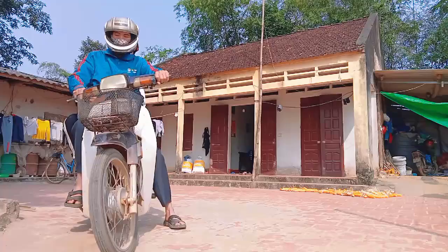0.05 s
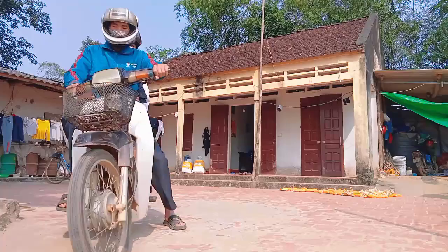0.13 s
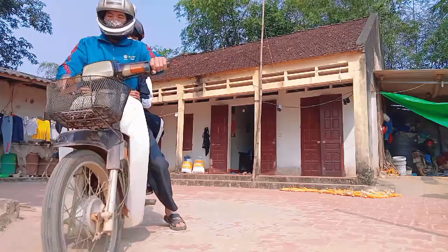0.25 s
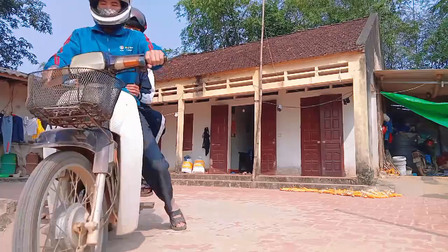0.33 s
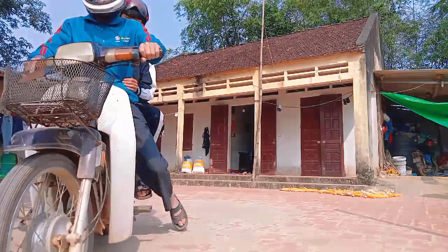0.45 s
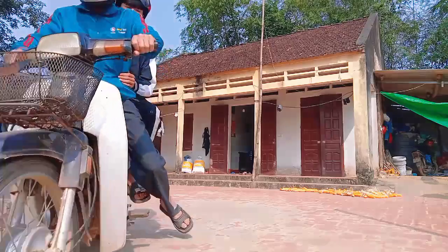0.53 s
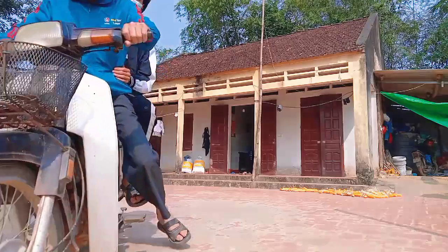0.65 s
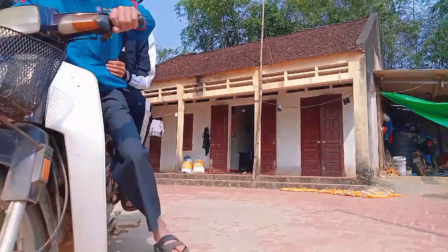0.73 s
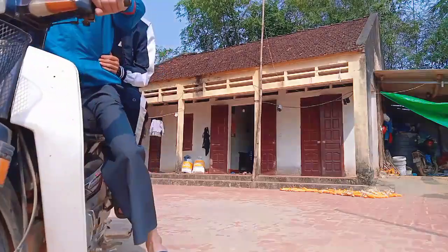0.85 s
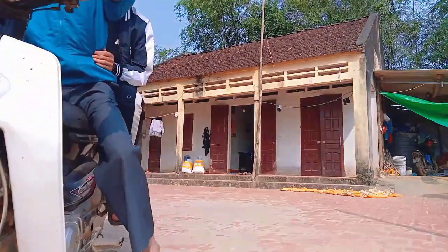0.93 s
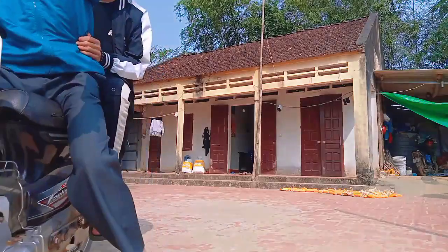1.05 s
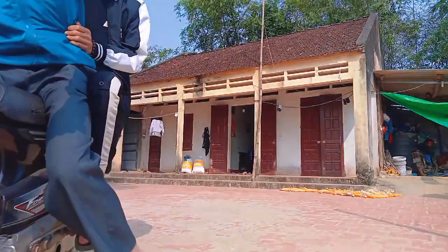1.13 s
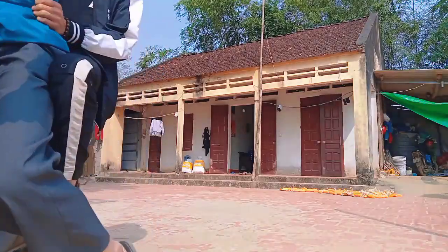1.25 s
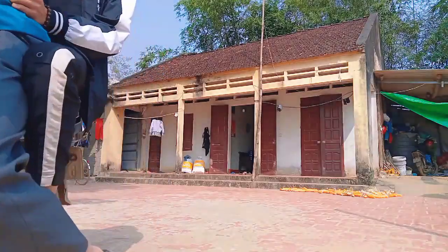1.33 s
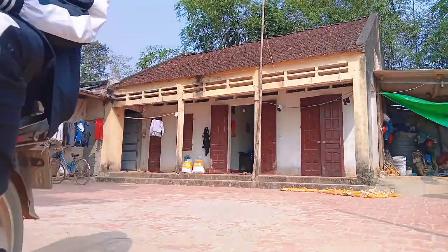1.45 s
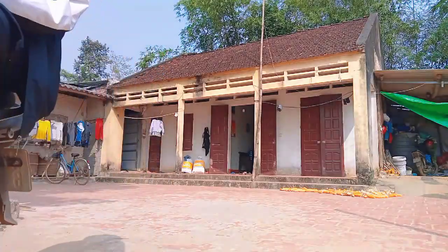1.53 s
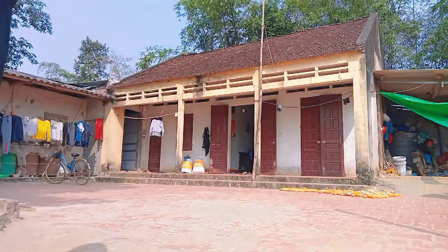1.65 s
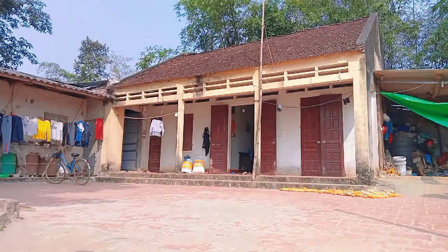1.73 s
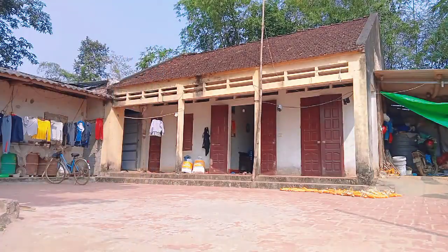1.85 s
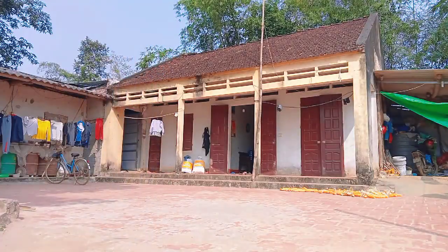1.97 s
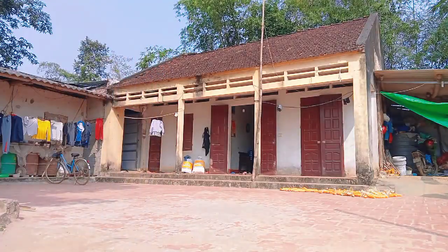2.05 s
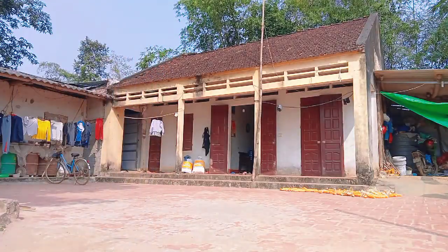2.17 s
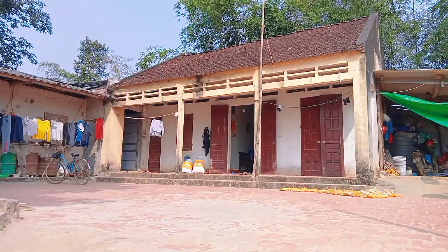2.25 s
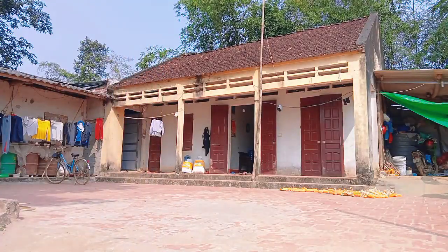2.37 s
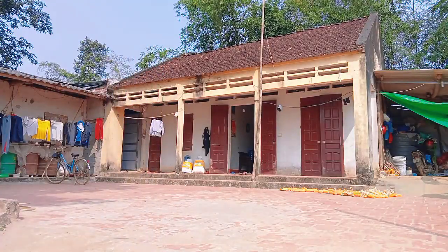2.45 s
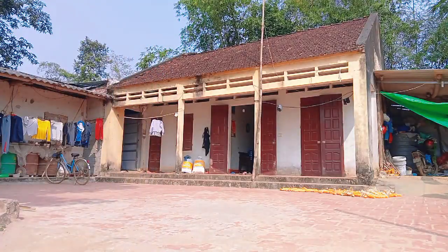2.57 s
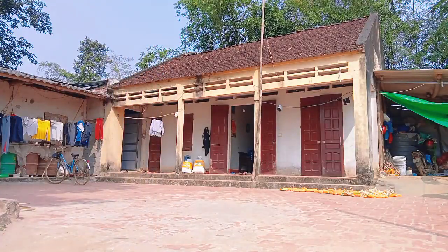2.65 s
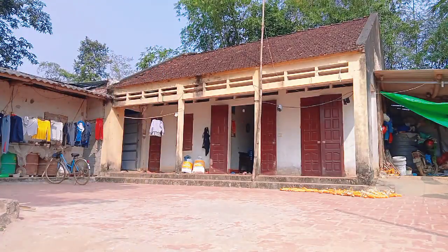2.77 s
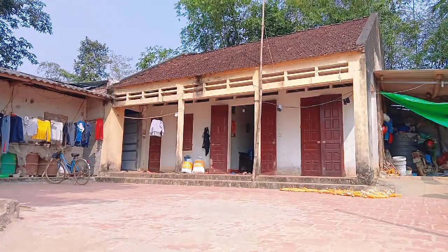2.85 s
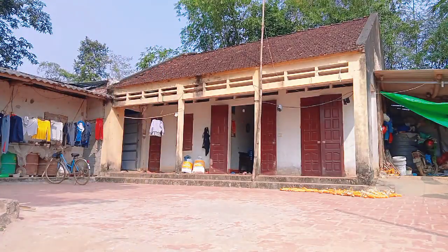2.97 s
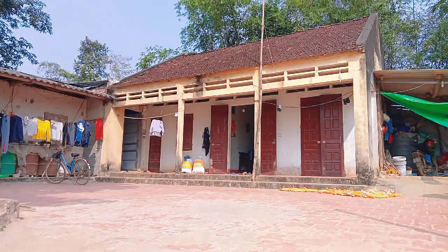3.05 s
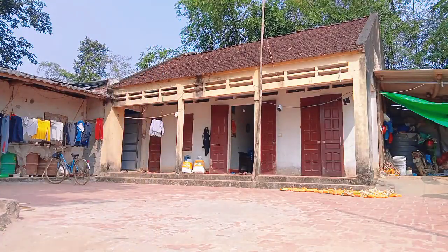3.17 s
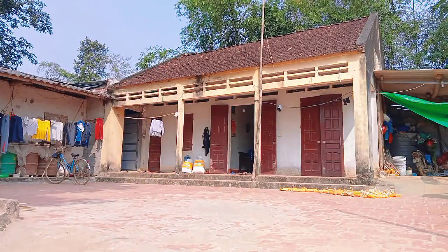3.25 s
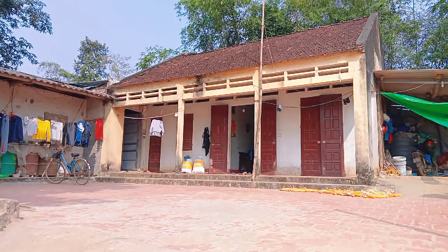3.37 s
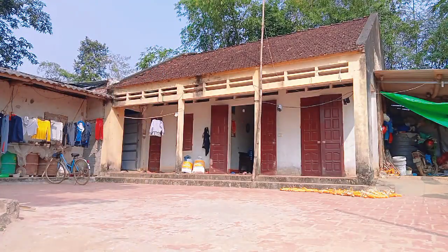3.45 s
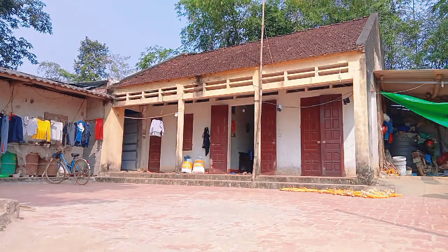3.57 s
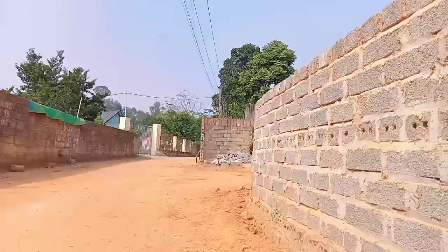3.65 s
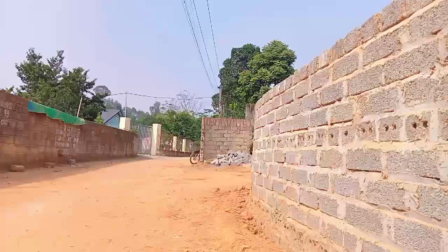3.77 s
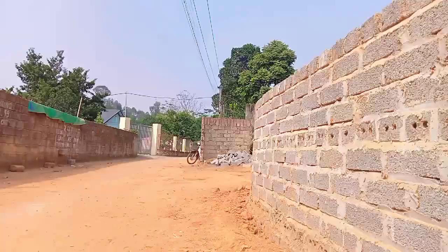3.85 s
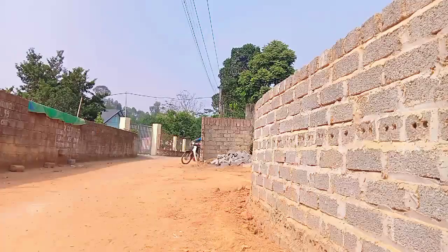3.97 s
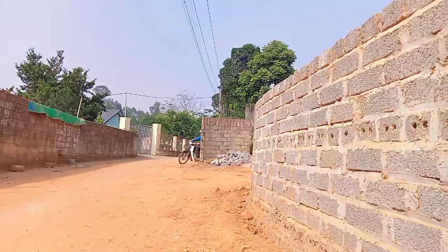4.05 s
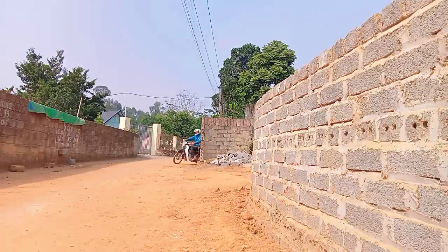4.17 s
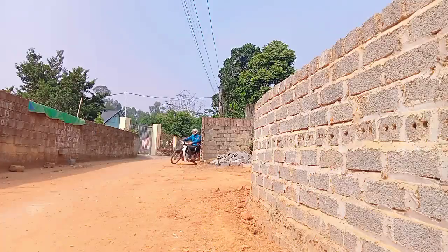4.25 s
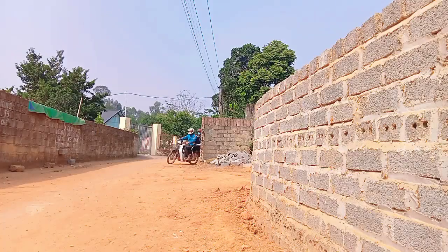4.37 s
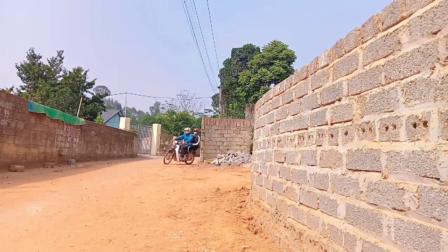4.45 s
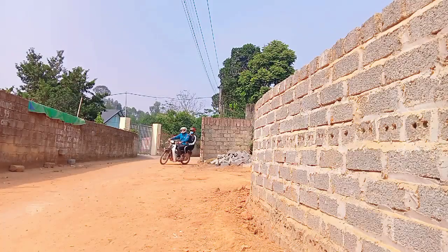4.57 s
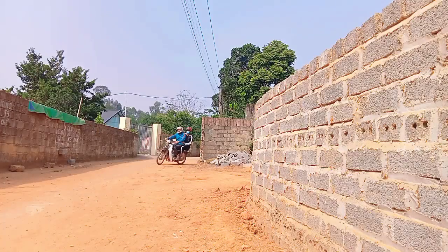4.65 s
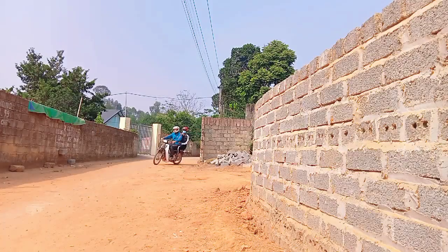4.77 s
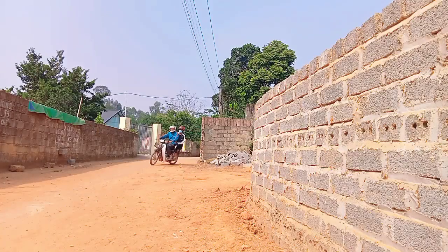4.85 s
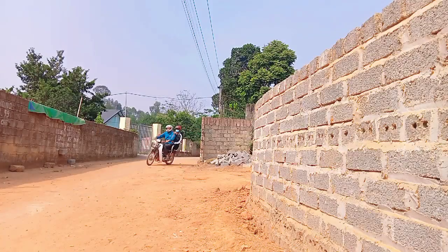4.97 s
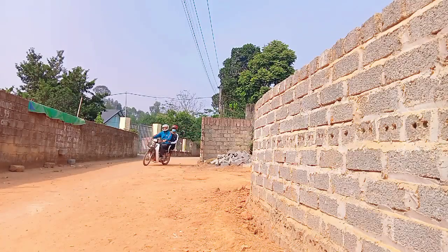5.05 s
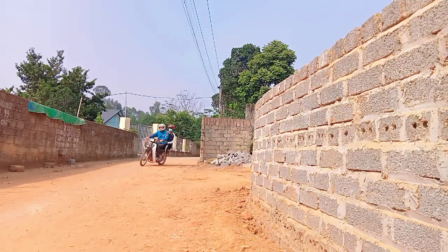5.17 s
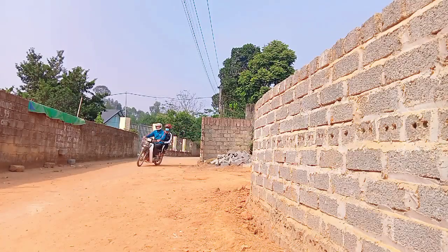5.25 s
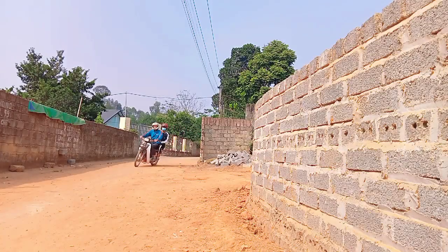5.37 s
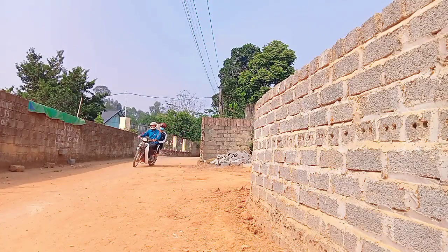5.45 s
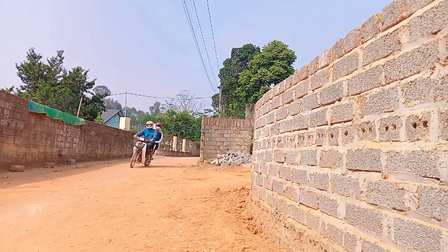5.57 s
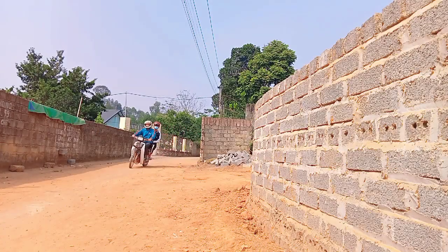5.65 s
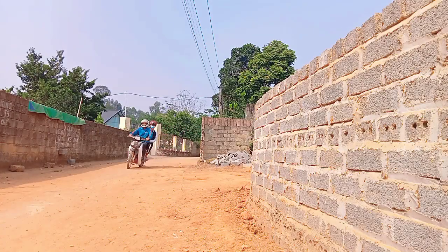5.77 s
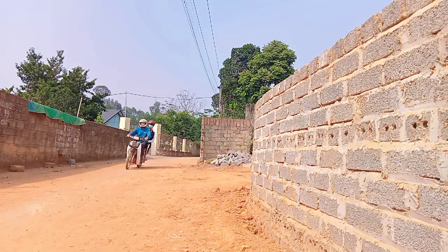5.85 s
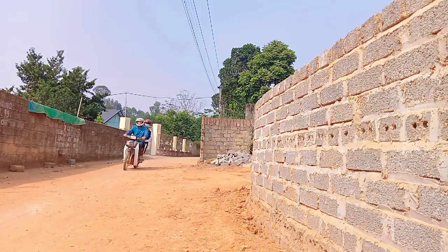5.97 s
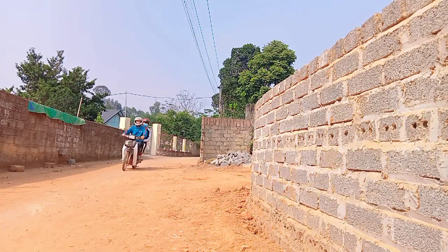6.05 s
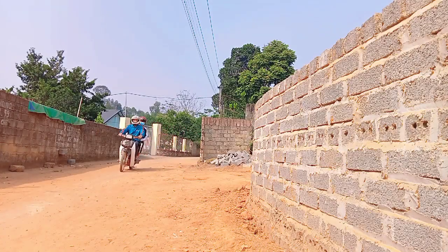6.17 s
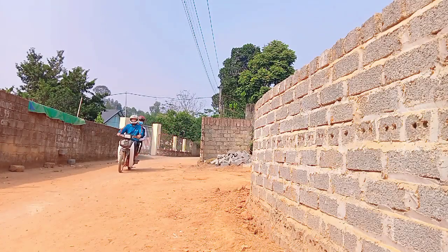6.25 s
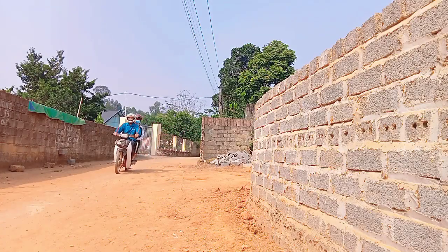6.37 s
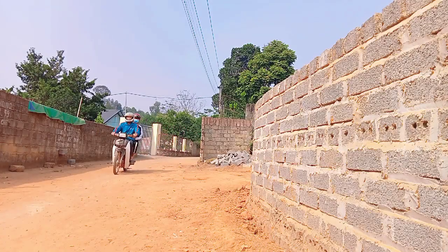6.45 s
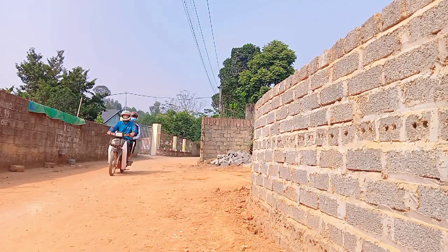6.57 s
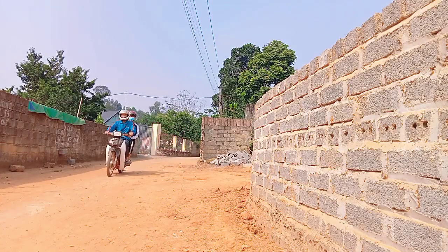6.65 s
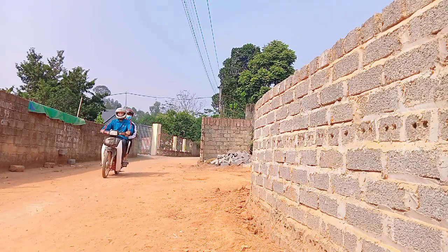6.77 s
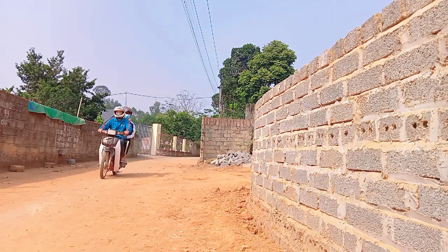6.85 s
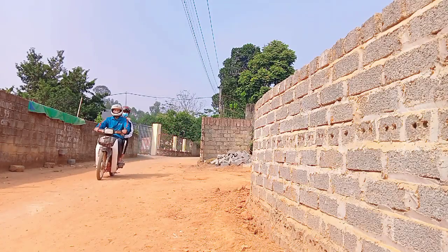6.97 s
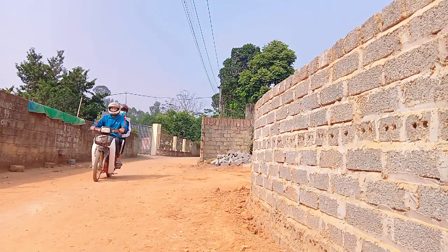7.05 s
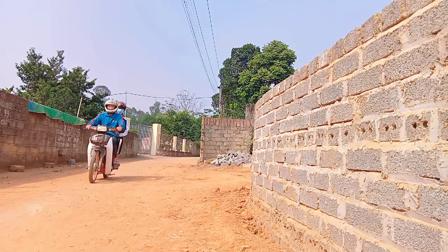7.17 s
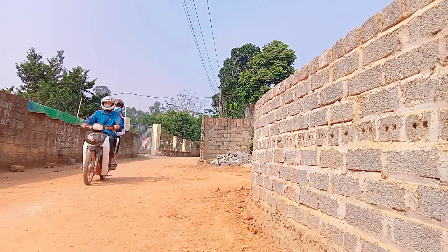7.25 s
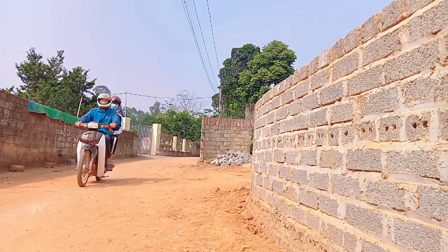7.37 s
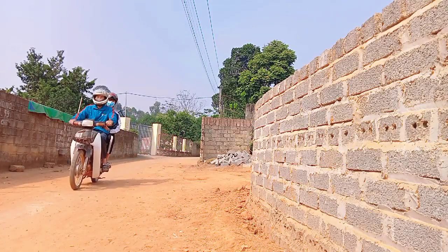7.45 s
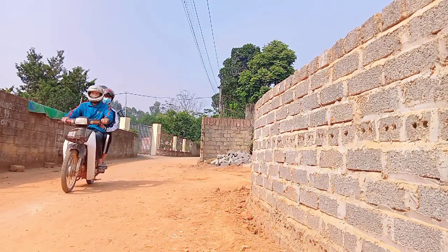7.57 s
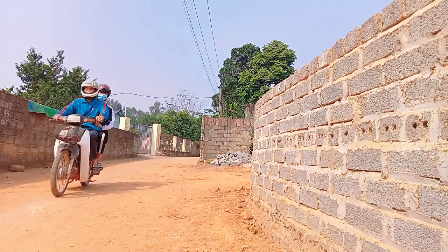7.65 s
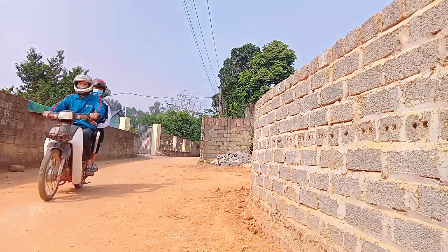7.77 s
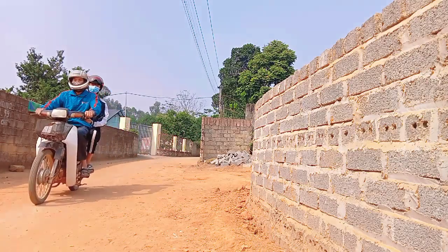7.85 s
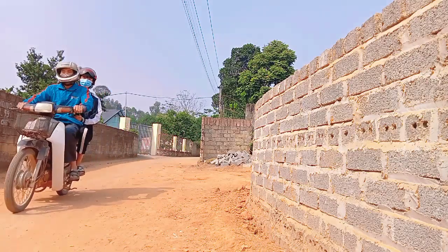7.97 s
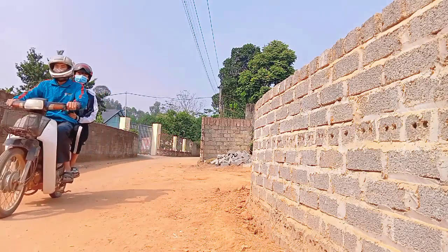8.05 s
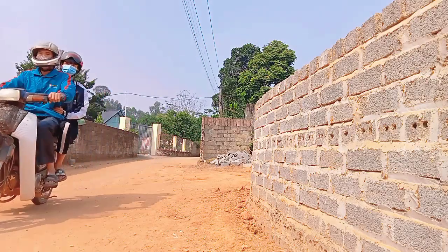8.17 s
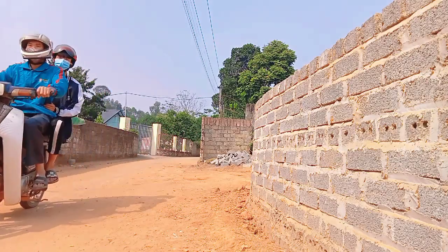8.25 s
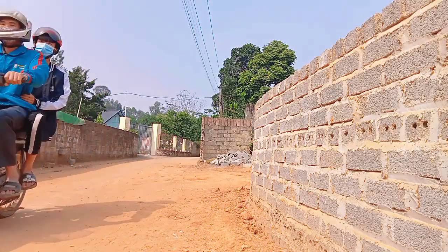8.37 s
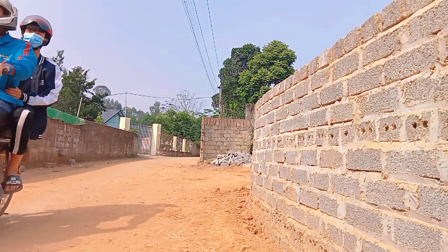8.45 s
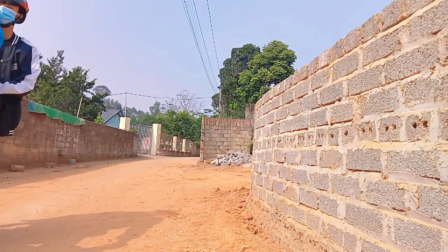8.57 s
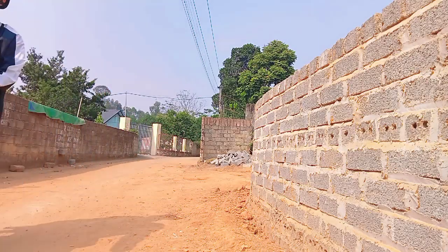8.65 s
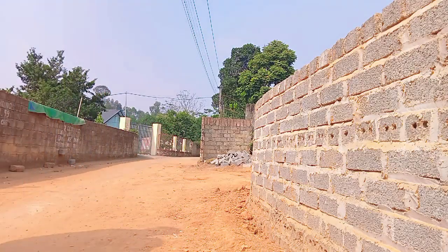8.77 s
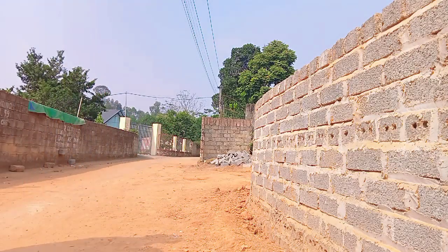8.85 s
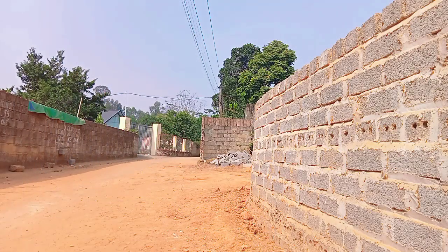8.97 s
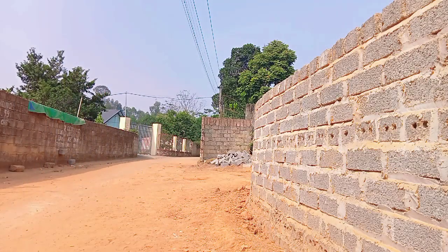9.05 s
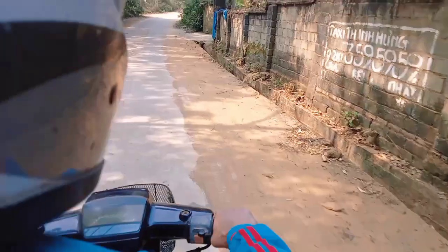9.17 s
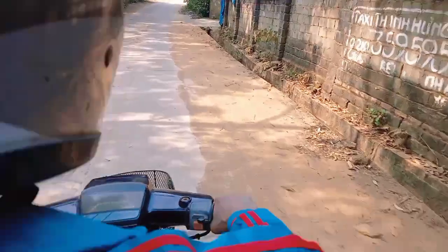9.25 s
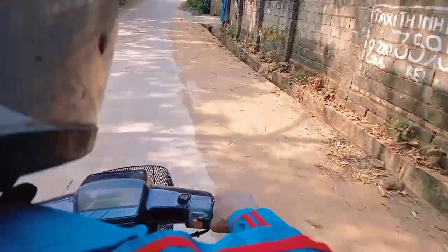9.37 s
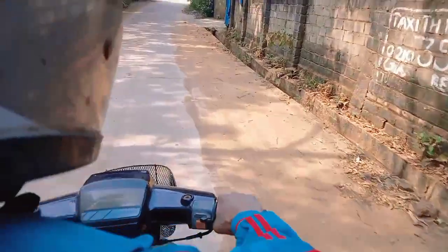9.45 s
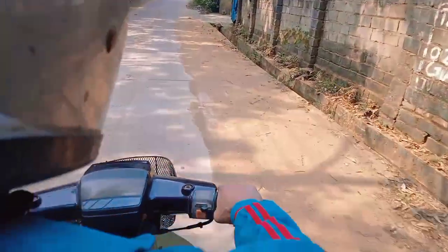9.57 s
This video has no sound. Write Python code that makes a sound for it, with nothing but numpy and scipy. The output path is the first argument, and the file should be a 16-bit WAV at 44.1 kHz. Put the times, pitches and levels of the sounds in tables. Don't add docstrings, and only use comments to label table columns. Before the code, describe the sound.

Slow separate barks and thumps of a small motorbike with rattling panels, then a faster booming approach between walls, a brief saddle moment, abrupt silence.

```python
import sys
import numpy as np
from scipy import signal
from scipy.io import wavfile
from scipy.ndimage import uniform_filter1d

SR = 44100
rng = np.random.default_rng(int(sys.argv[2]) if len(sys.argv) > 2 else 0)


def unload_wav(signal):
    wavfile.write(
        sys.argv[1],
        SR,
        np.round(np.clip(np.atleast_2d(signal).T, -1, 1) * 32767).astype(np.int16),
    )


def magnitude_from_level(level_db):
    exponent = np.asarray(level_db, float) / 20
    return 10 ** exponent


N = 423801

CUTS = [
    3.656,
    8.756,
    9.137,
]
# t/s, rate/firings per s
SPEED = [
    [(0, 17.282), (.3, 16.135), (.55, 16.05), (.75, 15.295), (1.25, 15.49), (1.7, 14.221), (2.25, 13.988),
     (2.45, 13.538), (2.85, 13.938), (3.66, 13.964)],
    [(3.66, 11.641), (3.95, 8.708), (4.45, 17.655), (4.75, 20.454), (5.15, 20.432), (5.75, 21.371),
     (6.3, 21.053), (6.75, 21.602), (7.35, 21.866), (7.85, 21.263), (8.25, 21.653), (8.77, 21.255)],
    [(8.75, 20.191), (8.9, 14.946), (9.02, 10.61), (9.14, 19.941)],
]
CRANK_AT_START = [.248, .332, .58]
# t/s, thump level/dB, pipe pointing away/0-1
PUTTER = [(0, -14, 0.38), (.9, -15.5, 0), (1.25, -12.5, 0), (1.75, -7, 0.8), (2.3, -5.5, 0.8),
          (2.55, -7.5, 0.85), (3.1, -12, 0.75), (3.655, -16, 0.66), (3.66, -38, 0.9), (3.95, -35.5, 0.9),
          (4.2, -27, 0.8), (4.5, -21.5, 0.36), (4.78, -19.5, 0), (8.76, -18, 0.6), (9.14, -18.5, 0.8)]
# t/s, bark level/dB, thump level/dB, late/ms
MISFIRES = [
    (.102, -1, -5.5, -1.5),
    (.16, -1.5, -3.5, -1.5),
    (.657, -5, -1, 3),
    (1.306, -24, -2.5, -7.5),
    (1.44, -13, -4.5, -1.5),
    (1.645, -1.5, -1.5, -0.5),
    (1.924, -3.5, -1.5, -2.5),
    (2.07, -18.5, -7.5, 6),
    (4.62, -3, 0, -1),
    (4.67, 1, -5, 1),
]
# f/Hz (negative starts with suction), level/dB, rise/ms, start/ms
BARK = [(295, 0, 3.9, .1), (-195, -10.5, 6.5, 1.5), (510, -20, 5, 0)]
# f/Hz, level/dB, rise/ms, start/ms
THUMP = [(-108, 0, 12.4, 0), (-78, -9, 13, 7)]
# f/Hz, level/dB, rise/ms, start/ms
PAVING = [(128, 0, 15, 15.7)]
# t/s, level/dB, dulling by distance/dB
CLATTER = [(0, -32, 2), (.32, -33.5, 2.5), (.98, -32.5, -1.5), (1.32, -28, -1.5), (1.99, -30, -1.5),
           (3.51, -40.5, 1.5), (3.65, -39, -1.5), (3.66, -55, 5.5), (3.98, -47.5, 7), (4.65, -33.5, 9.5),
           (5.18, -37, 7.5), (6.33, -37.5, 3), (6.77, -32.5, 7), (7.65, -31, 3), (8.31, -32.5, 0.5),
           (8.64, -29.5, -2), (8.95, -32.5, -3), (9.14, -31.5, 0)]
# f/Hz, level/dB per Hz
CLATTER_COLOUR = [(240, -31), (400, -1), (527, -8), (717, -5), (823, -8.5), (1230, -14), (1350, -9),
                  (1800, -13), (2230, -12.5), (2560, -15), (3380, -14), (5120, -39), (7290, -21.5),
                  (9030, -36.5), (15700, -44)]
# t/s, level/dB
FIZZ_PUFF_DB = [(1.4, -1), (2.2, -34.5), (2.75, 6.5), (3.1, 9), (3.65, 3), (3.66, -0.5)]
# f/Hz, width/Hz, level/dB against the cover
RATTLE = [(1590, 110, -16), (1950, 350, -29), (3310, 120, -20), (4900, 190, -42)]
# f/Hz, level/dB per Hz
YARD_RUMBLE = [(15, -49), (25, -24), (108, -3), (177, -10.5), (292, -1), (356, -22.5), (500, -29.5),
               (650, -57), (1100, -120)]
# f/Hz, level/dB per Hz
LANE_RUMBLE = [(15, -55), (42, -36), (108, -7), (170, -26), (292, -3.5), (356, -17), (500, -30.5),
               (650, -57)]
# middle t/s, length/s, f/Hz, width/Hz, peak level/dB
BUZZES = [(2.4, 0.25, 1450, 430, -40.5), (2.55, .3, 1700, 440, -37.5), (2.73, 0.17, 2700, 600, -45),
          (2.98, 0.26, 3130, 340, -39), (2.96, 0.19, 2570, 500, -43.5), (3.28, 0.32, 1410, 350, -43.5),
          (3.2, 0.19, 3450, 300, -50), (3.46, 0.83, 4700, 250, -51), (3.58, 0.19, 1370, 260, -46),
          (2.95, .8, 16000, 3000, -63.5), (2.72, 0.31, 4250, 500, -55), (0.56, 1.1, 940, 700, -46)]
# t/s, delay/s
BUZZ_LATE = [(2.6, .010), (2.72, .004)]
# t/s, f/Hz, level/dB
WHINE = [(0, 840, -37.5), (.6, 820, -78), (1.1, 900, -36), (1.5, 960, -32.5), (1.9, 763, -33),
         (2.3, 795, -33), (2.7, 890, -47), (3.655, 890, -49), (3.657, 1050, -57.5), (4.45, 1270, -53.5),
         (4.8, 1340, -60), (6.4, 1150, -46), (8.0, 950, -68), (8.9, 1032, -33), (9.14, 1000, -49.5)]
# t/s, f/Hz, width/Hz, level/dB
THUDS = [(.766, 564, 250, -23), (.494, 1150, 493, -23), (.555, 1350, 396, -34), (.868, 2000, 600, -36),
         (4.395, 920, 500, -42), (6.82, 950, 400, -30), (9.078, 14000, 2000, -37), (4.822, 750, 400, -34),
         (5.69, 700, 400, -35), (5.737, 750, 400, -38), (6.958, 900, 500, -35)]
# t/s, peak level/dB, dull part level/dB, t60/s
CLICKS = [(1.1657, -48, -5, 0.022), (1.179, -37, 7.5, 0.028), (1.267, -32, -5, 0.0096),
          (1.723, -37, 7.5, 0.026), (1.9634, -44, -8, 0.025), (2.0497, -49, -9, 0.025),
          (2.7033, -35, -3, 0.019), (2.8494, -38.5, -7, 0.021), (4.1405, -55, -4, 0.068),
          (5.9695, -43, 1, 0.02), (8.097, -31, -16, 0.067), (8.2721, -39, -4, 0.027),
          (8.4761, -33, -7, 0.025), (8.5101, -32, -4, 0.029), (8.631, -34, -5, 0.052),
          (8.7829, -39, -4, 0.025), (8.8418, -42, -0.5, 0.03), (8.9595, -34, -2.5, 0.025),
          (8.9894, -38.5, 0, 0.027), (9.0558, -39.5, -4, 0.023), (9.0803, -28, -7, 0.017)]
# f/Hz, width/Hz, level/dB
JINGLE = [(7800, 520, -44.5), (11700, 700, -68), (14200, 700, -62)]
# f/Hz, level/dB, rise/ms
LANE_BARK = [(324, 4, 7.7), (258, -5.5, 4.1), (442, -9, 6.4), (523, -13.5, 4.2), (663, -14, 3.9)]
CYCLES_TO_CREST = [1.75, .75, 1.75, 2.75, 2.75]
# f/Hz, level/dB, rise/ms, start/ms
CASING = [(405, 0.5, 13, 3.5), (533.7, -0.5, 14.3, 2), (617, 4.5, 14.6, 3.11), (736, -5, 9.1, 2.3),
          (883, -6, 8, 2.9), (991, -3, 5.8, 8.12), (1619, -4.5, 5.3, 10)]
# f/Hz, level/dB, rise/ms, start/ms
LOW_NOTE = [(-215, 0, 8.7, 0.24)]
# f/Hz, level/dB, rise/ms, start/ms
MIDDLE_NOTE = [(297, 0, 6.5, 0.67)]
# t/s, low note level/dB, middle note level/dB against the bark
PIPE_DB = [(3.66, -1, -11), (5.1, -10, -16.5), (5.6, -16, -7.5), (6.3, -23, -21), (7.2, -21, -14.5),
           (7.7, -15, -10), (8.1, -20, -20.5), (8.6, -15.5, -7), (8.8, -19.5, -22)]
# t/s, low note late/ms, middle note late/ms, far echo/ms, far echo level/dB against the near one
WALL_LAG = [(4.76, 0, 0.5, 26.5, -1), (5.6, -4, 0.5, 29.4, -3.5), (7.2, -5, 1, 25, 6),
            (7.6, -3.5, 4, 19, 4), (7.85, -3.5, 3, 19, -2), (8.1, 8, 6, 18.2, -6.5),
            (8.5, 10.5, 16.5, 20, 5), (8.75, 13.5, 17.5, 20.3, 2), (8.77, 1, 3, 20, 0)]
# f/Hz, level/dB, rise/ms, start/ms
LANE_HUM = [(68, 0, 12, 3.2)]
# t/s, level/dB against the thump
HUM_DB = [(3.9, 0), (4.3, -18), (8.75, -18), (8.76, -3)]
# t/s, level/dB
REPEAT_DB = [(3.9, 3), (4.1, 2), (4.3, -4), (4.8, -4)]
# t/s, length/s, from f/Hz, to f/Hz, level/dB
BIRDS = [
    (3.93, .19, 3000, 2985, -62),
    (4.486, 0.035, 3200, 2430, -54),
    (5.43, .035, 3100, 2400, -48),
]
# t/s, cancelled f/Hz, depth/0-1
GROUND = [(4.6, 960, 0.3), (5.2, 1050, 0.7), (6.2, 835, 0.4), (7.0, 697, 0.7), (7.8, 580, 0.34),
          (8.3, 560, 0), (8.7, 560, 0.1)]
# t/s, bark level/dB, bark wall echo/dB, bark late/ms, boom level/dB
LANE = [(4.76, -27, -1.5, 3, -40), (4.97, -28, -1, 0.5, -41), (5.2, -27, -6, -0.5, -33.5),
        (5.5, -24.5, -14, 1, -35.5), (5.76, -25, -11.5, 0, -34.5), (6.25, -23.5, -14, 0, -29),
        (6.6, -24, -7, 0.5, -30), (6.95, -20, -22, 0.5, -38.5), (7.25, -19.5, -16, 2.5, -35),
        (7.5, -20, -14, 3.5, -31.5), (7.85, -22.5, -1.5, 4.5, -26), (8.1, -18.5, -12.5, -2.5, -21),
        (8.4, -23, -1.5, -2, -19.5), (8.6, -20, -9, -3, -21), (8.76, -16, -19.5, -0.5, -24)]
# t/s, extra path/wavelengths, strength
WALL = [(4.76, -.6, .8), (5.38, .5, 1.8), (5.85, 1.5, 1.4), (6.45, 2.5, 1.3), (6.65, 2.5, -0.4),
        (6.85, 3, 2), (7.22, 5.5, 1), (7.5, 6, 3), (7.78, 7, 0), (8., 7, 0.6)]
# t/s, lag/share of a cycle
BOOM_LAG = [(4.76, .33), (7.2, .33), (7.6, .37), (8.76, .38)]
# t/s, level/dB
DRONE = [(4.76, -35), (4.95, -33), (5.25, -36), (5.65, -31.5), (7.45, -32), (7.9, -44), (8.65, -24.5)]
ORDER_DB = [1, -2, -17.5]

T = np.arange(N) / SR
IN_YARD = T < CUTS[0]


def evened(x):
    return x / np.sqrt(np.mean(x ** 2) + 1e-20)


def curve(rows):
    s, *columns = np.transpose(rows)
    return [np.interp(T, s, c) for c in columns]


def add(mix, s, sound):
    part = mix[max(round(s * SR), 0):][:len(sound)]
    part += sound[:len(part)]


def train(times, gains):
    out = np.zeros(N)
    i = np.round(np.asarray(times) * SR).astype(int)
    np.add.at(out, np.clip(i, 0, N - 1), gains)
    return out


def delayed(x, late_ms):
    i = np.flatnonzero(x)
    return train(i / SR + late_ms[i] / 1000, x[i])


def ring(modes, order):
    t, out = np.arange(4400) / SR, 0
    for hz, db, rise, start in modes:
        age = np.maximum(t - (start + 1) / 1000, 0)
        u = age / (rise / 1000)
        swell = (u * np.exp(1 - u)) ** order
        out = out + magnitude_from_level(db) * swell * np.sin(2 * np.pi * hz * age)
    return out / abs(out).max()


def resonate(x, hz, width):
    turn = np.exp(2j * np.pi * np.cumsum(hz * np.ones(len(x))) / SR)
    r = np.exp(-np.pi * width / SR)
    return 2 * (turn * signal.lfilter([1 - r], [1, -r], x / turn)).real


def resonate_twice(x, hz, width):
    return resonate(resonate(x, hz, width), hz, width)


def noise(points, patchy_db):
    frames, hz = N // 128 + 6, np.fft.rfftfreq(512, 1 / SR)
    a, b, patches = rng.standard_normal((frames, 257, 3)).T
    patches = evened(uniform_filter1d(uniform_filter1d(patches, 5, 0), 6, 1))
    f, level_db = np.transpose(points)
    colour_db = np.interp(np.log(hz + 1), np.log(f), level_db)[:, None]
    return hz, (a + 1j * b) * magnitude_from_level(colour_db + patchy_db * patches)


def band(hz, z, lo, hi):
    kept = z * ((hz >= lo) & (hz < hi))[:, None]
    return evened(signal.istft(kept, nperseg=512, noverlap=384)[1][:N])


def crank():
    starts, moments, counts = [0] + CUTS, [], []
    for k, rows in enumerate(SPEED):
        running = T >= rows[0][0]
        turns = CRANK_AT_START[k] + np.cumsum(curve(rows)[0] * running) / SR
        at = np.flatnonzero(np.diff(np.floor(turns)) > 0) / SR
        moments.append(at[(at > starts[k]) & (at < starts[k + 1])])
        counts.append(turns)
    return counts[1], np.concatenate(moments)


def frame():
    t, luck = np.arange(4400) / SR, rng.random((36, 3))
    t60_s, tilt_db = 0.15, -7.5
    hz = np.geomspace(470, 2400, num=36) * (1 + 0.04 * luck[:, 0])
    sizes = magnitude_from_level(tilt_db * np.log2(hz / hz[0]) / 2 + 2.7 * luck[:, 1])
    modes = np.sin(2 * np.pi * (hz[:, None] * t + luck[:, 2:]))
    out = sizes @ modes * magnitude_from_level(-60 * t / t60_s) * np.minimum(t / 0.0021, 1)
    return out / abs(out).max()


def putter(at):
    bark, thump = ring(BARK, order=1), ring(THUMP, order=2.5)
    level_db, away = (c[(at * SR).astype(int)] for c in curve(PUTTER))
    weak = np.zeros((len(at), 3))
    for s, *loss in MISFIRES:
        weak[abs(at - s).argmin()] = loss
    uneven_db = -0.8 * rng.standard_normal((len(at), 2))
    barks = magnitude_from_level(level_db - 2 - 6.5 * away + weak[:, 0] + uneven_db[:, 0])
    thumps = magnitude_from_level(level_db + weak[:, 1] + .5 * uneven_db[:, 1])
    s = at + weak[:, 2] / 1000 - .001

    paved = at < CUTS[0]
    yard = signal.oaconvolve(train(s, paved * barks * magnitude_from_level(2.0)), bark + magnitude_from_level(-19.5) * frame())
    yard += signal.oaconvolve(train(s, paved * thumps), thump)
    rung = paved * thumps * magnitude_from_level(-26.5 + 16.5 * away)
    yard += signal.oaconvolve(train(s, rung), ring(PAVING, order=2.5))

    barks, thumps, walled = barks * ~paved, thumps * ~paved, s < CUTS[1]
    late = s + 0.0046 * walled
    repeats = walled * thumps * magnitude_from_level(np.interp(s, *np.transpose(REPEAT_DB)))
    thumps = train(late, thumps)
    thumps += train(late + 0.027, repeats * magnitude_from_level(-4.5)) + train(late + 0.0474, repeats * magnitude_from_level(-6.5))
    echo = train(s + 0.02, walled * barks * magnitude_from_level(-3.5))
    barks = train(s + 0.0089 * ~walled, barks * magnitude_from_level(-2.5)) + echo
    far = lane_bark(barks) + signal.oaconvolve(thumps, thump)[:N]
    hum = thumps * magnitude_from_level(curve(HUM_DB)[0])
    far += signal.oaconvolve(hum, ring(LANE_HUM, order=2.5))[:N]
    return yard[:N] * IN_YARD + far


def clatter(fired):
    case_db, dull_db = curve(CLATTER)
    cover_db = case_db - 6 - dull_db
    after_yard_db = 3 * ~IN_YARD
    fizz_db = case_db - 15 - 0.83 * dull_db + after_yard_db
    puff_db = -15 + 15 * curve(PUTTER)[1] ** 2 * IN_YARD + 2 * ~IN_YARD

    luck = magnitude_from_level(1.7 * rng.standard_normal((len(fired), 3)))
    jolts = train(fired + 0.00081, 0.81 * luck[:, 0])
    jolts += train(fired + .013, luck[:, 1]) + train(fired + .022, 0.59 * luck[:, 2])
    t = np.arange(1300) / SR
    shake = signal.oaconvolve(jolts, np.exp(-t / 0.0074) * np.minimum(t / 0.0012, 1))[:N]
    jolt = magnitude_from_level(puff_db) * shake

    ticks = magnitude_from_level(5.58 * np.minimum(rng.exponential(1, N), 5)) * (rng.random(N) < 160 / SR)
    grain = 1 + 0.2 * signal.oaconvolve(ticks, np.exp(-np.arange(300) / SR / 0.0013))[:N]

    hz, z = noise(CLATTER_COLOUR, patchy_db=3.0)
    out = magnitude_from_level(case_db - 8.0) * band(hz, z, 380, 1200) * (1 + 5.0 * jolt)
    out += magnitude_from_level(cover_db - 2.2) * band(hz, z, 1200, 4110) * (1 + 2.84 * jolt) * grain ** 0.44
    fizz_jolt = 3.2 * jolt * magnitude_from_level(curve(FIZZ_PUFF_DB)[0])
    out += magnitude_from_level(fizz_db - 3.0) * band(hz, z, 4174, 16000) * (1 + fizz_jolt) * grain / 1.465
    out += rattles(jolts, shake, cover_db) + buzzing(fired)
    out += pings(case_db - 10.5, 514, 1254.0, per_s=700) + pings(cover_db - 12.5, 1316, 3700, per_s=500)
    return out + rumble(case_db)


def rattles(jolts, shake, cover_db):
    scuffle = rng.standard_normal(N) * abs(shake) ** 1.5
    drive = scuffle + 6.0 * jolts
    return sum(magnitude_from_level(cover_db + db) * evened(resonate(drive, f, w)) for f, w, db in RATTLE)


def pings(level_db, lo, hi, per_s):
    knocks = magnitude_from_level(5.3 * np.minimum(rng.exponential(1, N), 2.5)) * (rng.random(N) < per_s / SR)
    part, t, out = rng.integers(0, 8, N), np.arange(1500) / SR, 0
    swell = np.exp(-t / 0.0065) * (1 - np.exp(-t / .002))
    for k, f in enumerate(np.geomspace(lo, hi, num=8)):
        out = out + signal.oaconvolve(knocks * (part == k), swell * np.sin(2 * np.pi * f * t))[:N]
    return magnitude_from_level(level_db) * evened(out)


def rumble(case_db):
    yard = magnitude_from_level(-2.5) * band(*noise(YARD_RUMBLE, patchy_db=5.5), 20, 460)
    lane = magnitude_from_level(-6.5) * band(*noise(LANE_RUMBLE, patchy_db=3.0), 20, 460)
    return magnitude_from_level(case_db) * np.where(IN_YARD, yard, lane)


def buzzing(fired):
    t = np.arange(round(CUTS[0] * SR)) / SR
    u = np.linspace(0, 1, int(.016 * SR))
    scuff = np.minimum(u / .05, 1) * np.sqrt(1 - u)
    luck = magnitude_from_level(1.5 * rng.standard_normal(len(fired)))
    late = fired + np.interp(fired, *np.transpose(BUZZ_LATE))
    stroke = signal.oaconvolve(train(late, luck), scuff)[:len(t)]
    drive = stroke * rng.standard_normal(len(t))
    out = np.zeros(N)
    for s, length, hz, width, db in BUZZES:
        swell = np.exp(-(2 * (t - s) / length) ** 2)
        buzz = evened(resonate(resonate(drive, hz, width), hz, 2 * width))
        out[:len(t)] += magnitude_from_level(db) * swell * buzz
    return out


def whine():
    hz, level_db = curve(WHINE)
    return magnitude_from_level(level_db) * evened(resonate_twice(rng.standard_normal(N), hz, 230))


def thuds():
    out, fade = np.zeros(N), np.exp(-np.arange(400) / SR / 0.0036)
    for s, hz, width, db in THUDS:
        add(out, s, magnitude_from_level(db) * evened(resonate_twice(rng.standard_normal(400), hz, width)) * fade)
    return out


def clicks():
    out, t = np.zeros(N), np.arange(2000) / SR
    for s, db, dull_db, t60 in CLICKS:
        snap = rng.standard_normal(2000)
        bright = np.diff(snap, prepend=0) / 3
        add(out, s, magnitude_from_level(db - 60 * t / max(t60, .004)) * (bright + magnitude_from_level(dull_db) * snap))
    return signal.lfilter([1, 0, -.3], [1], out - 2.3 * resonate(out, 4600, 3700))


def brake_squeak():
    out = np.zeros(N)
    squeak = evened(resonate_twice(rng.standard_normal(2200), 2300, 300))
    add(out, 2.108, magnitude_from_level(-31.0) * squeak * np.hanning(2200))
    return out


def scrape():
    out = np.zeros(N)
    jingle = sum(magnitude_from_level(db) * evened(resonate(rng.standard_normal(2600), f, w)) for f, w, db in JINGLE)
    add(out, 3.588, jingle * np.hanning(2600))
    return out


def lane_bark(kicks):
    crest_ms = 5.45
    notes = []
    for (hz, db, rise), cycles in zip(LANE_BARK, CYCLES_TO_CREST):
        notes.append((hz, db, rise, crest_ms - 1000 * cycles / hz))
    low_db, middle_db = curve(PIPE_DB)
    low_ms, middle_ms = curve(WALL_LAG)[:2]
    low = signal.oaconvolve(delayed(kicks * magnitude_from_level(low_db), low_ms), ring(LOW_NOTE, order=1))
    low += signal.oaconvolve(delayed(kicks * magnitude_from_level(middle_db), middle_ms), ring(MIDDLE_NOTE, order=1))
    bark = ring(notes, order=1) + magnitude_from_level(-16) * ring(CASING, order=1) + magnitude_from_level(-17.5) * frame()
    return (signal.oaconvolve(kicks, bark) + low)[:N]


def birds():
    out = np.zeros(N)
    for s, length, from_hz, to_hz, db in BIRDS:
        hz = np.linspace(from_hz, to_hz, int(length * SR))
        chirp = np.sin(2 * np.pi * np.cumsum(hz) / SR)
        add(out, s, magnitude_from_level(db) * chirp * signal.windows.tukey(len(hz), .5))
    return out


def grounded(x):
    hz, depth = curve(GROUND)
    width_hz = 170
    return x + depth * (.6 * resonate(x, 1.32 * hz, width_hz) - resonate(x, hz, width_hz))


def stone_knock():
    out = np.zeros(N)
    hit = rng.standard_normal(500) * np.hanning(500)
    knock = evened(resonate_twice(hit, 1800, 700) + 0.08 * resonate_twice(hit, 3100, 900))
    add(out, 4.722, magnitude_from_level(-38.5) * knock * np.hanning(500))
    return out


def cruise(turns, at):
    bark_db, echo_db, late_ms, boom_db = curve(LANE)
    path, strength = curve(WALL)
    far_ms, far_db = curve(WALL_LAG)[2:]
    lag = curve(BOOM_LAG)[0]
    waves = [np.exp(2j * np.pi * (k * turns - .77 - (k - 5) * lag)) for k in range(3, 8)]
    wall = 1 + strength * np.exp(-2j * np.pi * path)
    waves[3:] = [w * wall for w in waves[3:]]
    levels_db = [-51, curve(DRONE)[0]] + [boom_db + db for db in ORDER_DB]
    boom = np.sqrt(2) * sum(magnitude_from_level(db) * w.real for db, w in zip(levels_db, waves))
    boom *= np.interp(T, [4.77, 4.83, 8.745, 8.756], [0, 1, 1, 0])

    i = (at * SR).astype(int)
    size = magnitude_from_level(bark_db[i] + 6.5 + 0.37 * rng.standard_normal(len(i)))
    heard = at + late_ms[i] / 1000
    kicks = train(heard - .001, size)
    kicks += train(heard + 0.00961, size * magnitude_from_level(echo_db[i]))
    kicks += train(heard + far_ms[i] / 1000, size * magnitude_from_level(echo_db[i] + far_db[i]))
    return boom + lane_bark(kicks) * (T < CUTS[1])


def scene():
    turns, fired = crank()
    merge_s = 4.79
    even = (fired > merge_s) & (fired < CUTS[1])
    engine = putter(fired[~even]) + cruise(turns, fired[even]) + clatter(fired)
    hits = thuds() + clicks() + brake_squeak() + scrape() + stone_knock()
    return (grounded(engine) + whine() + hits + birds())[None]


def low_pass(x):
    return signal.sosfilt(signal.butter(12, 16470, fs=SR, output="sos"), x)


def record(dry):
    lowpass = signal.firwin(511, 15700, window=("kaiser", 9), fs=SR)
    limited = signal.oaconvolve(dry, lowpass[None], "same")
    limited = signal.sosfilt(signal.butter(2, 32, "high", fs=SR, output="sos"), limited)
    return low_pass(limited * (T < CUTS[2]))


dry = scene()
out = record(dry)
unload_wav(out)
```